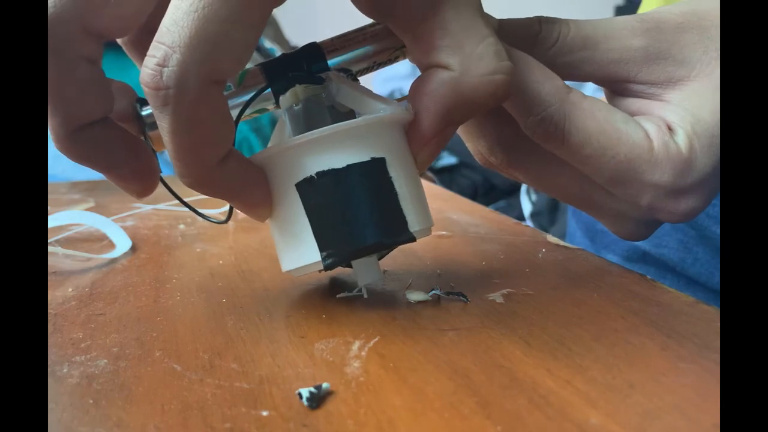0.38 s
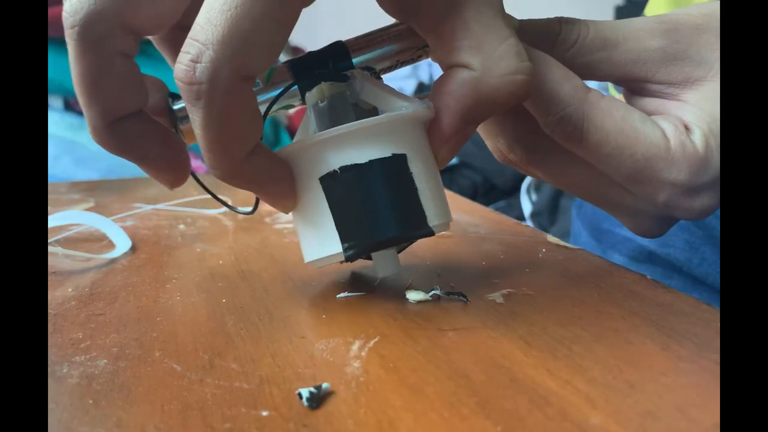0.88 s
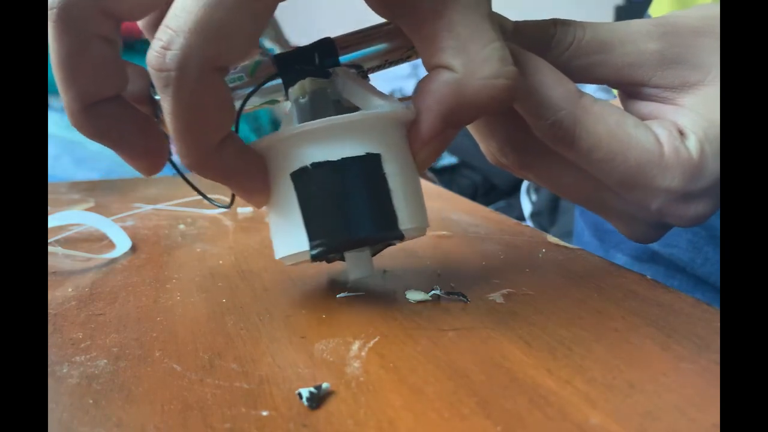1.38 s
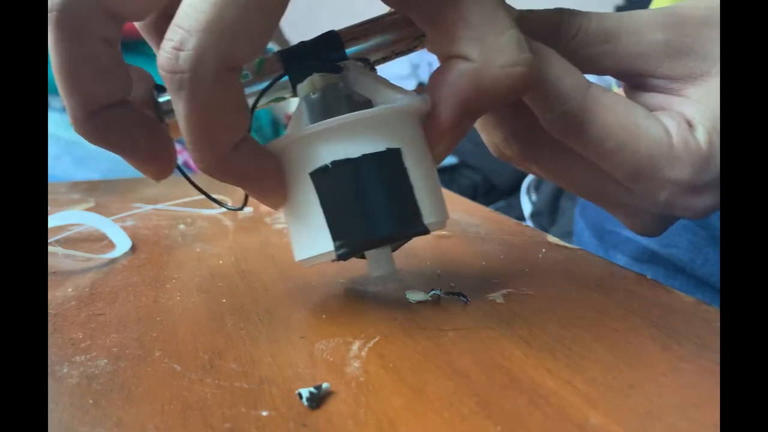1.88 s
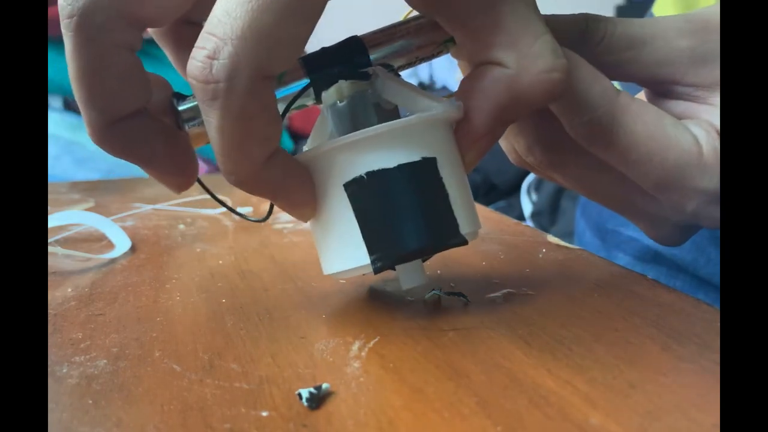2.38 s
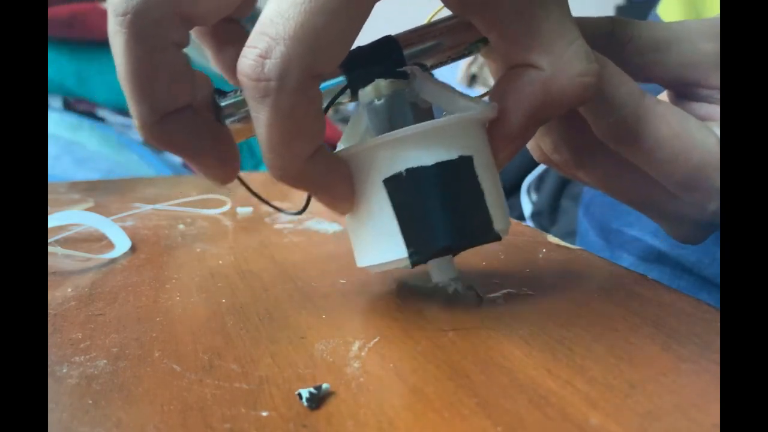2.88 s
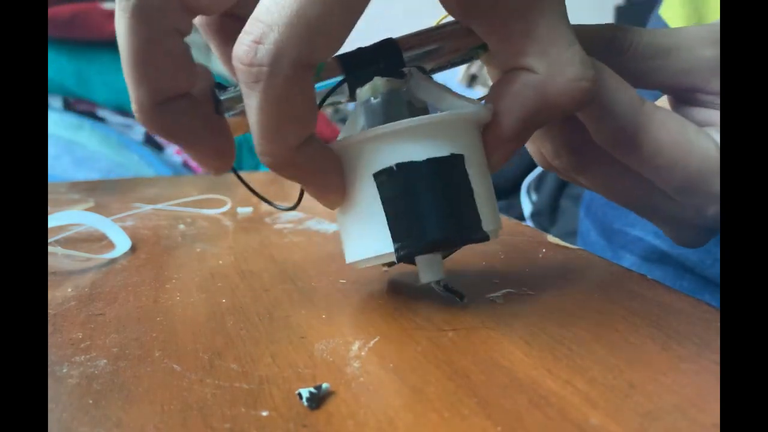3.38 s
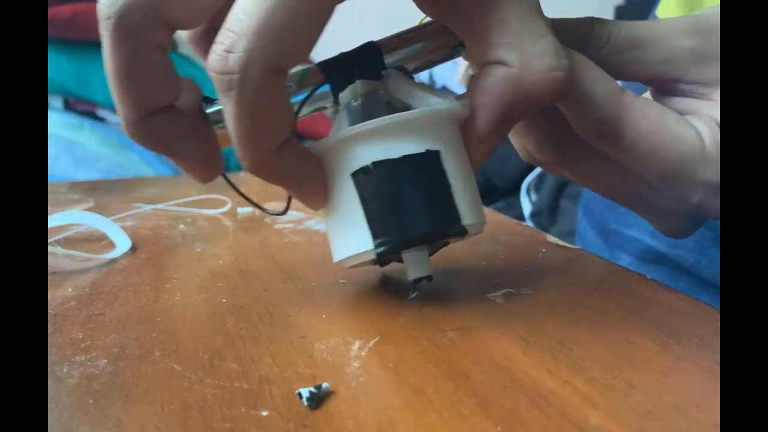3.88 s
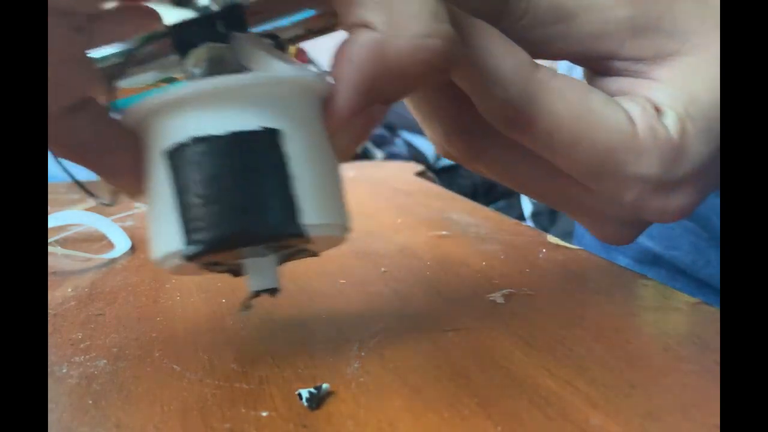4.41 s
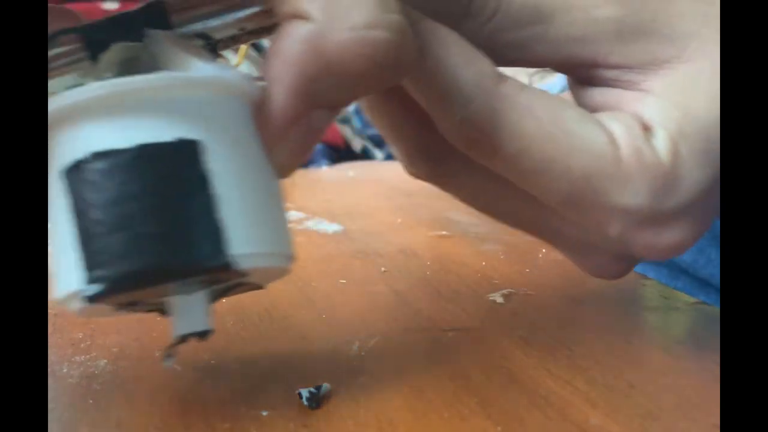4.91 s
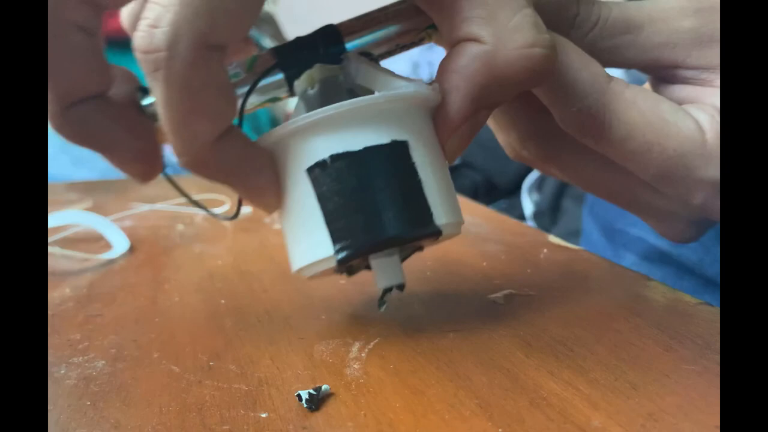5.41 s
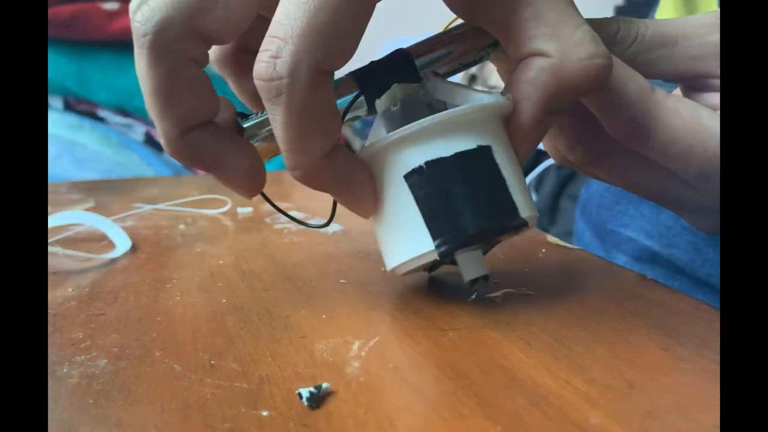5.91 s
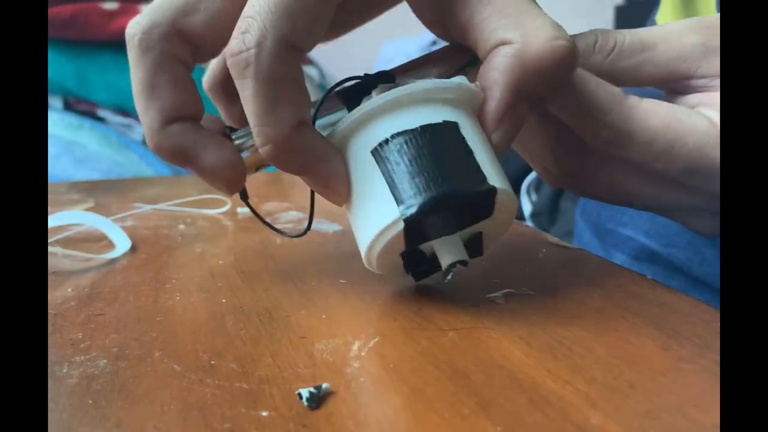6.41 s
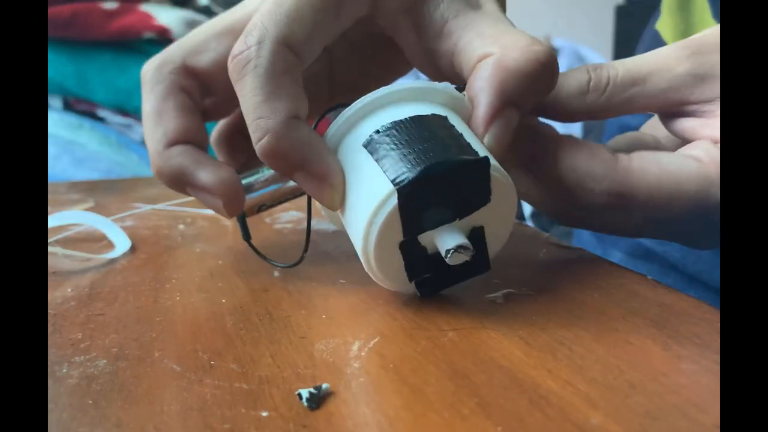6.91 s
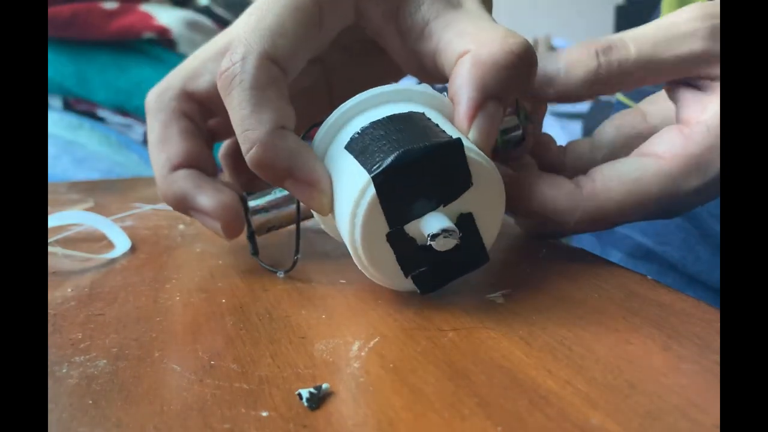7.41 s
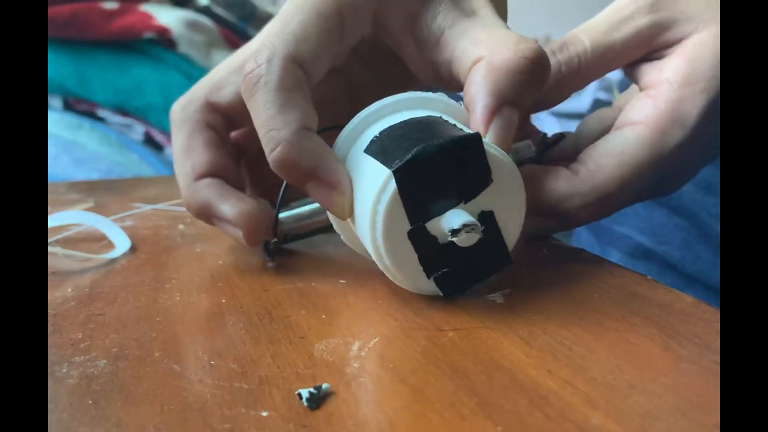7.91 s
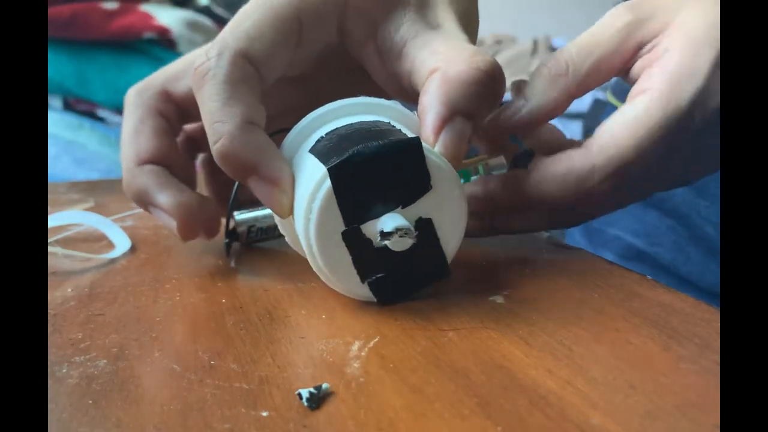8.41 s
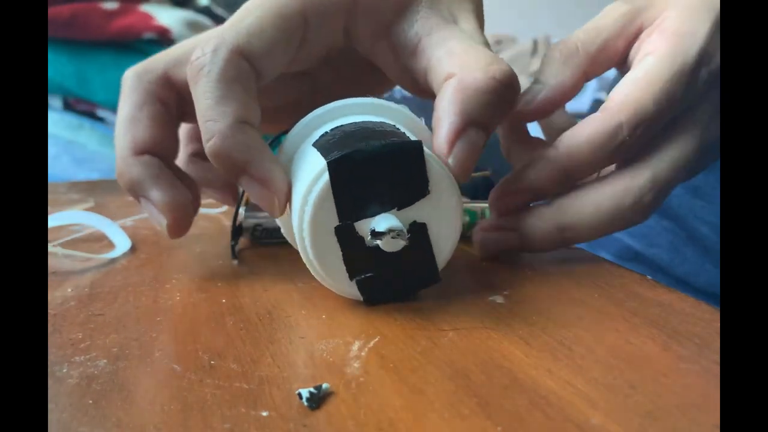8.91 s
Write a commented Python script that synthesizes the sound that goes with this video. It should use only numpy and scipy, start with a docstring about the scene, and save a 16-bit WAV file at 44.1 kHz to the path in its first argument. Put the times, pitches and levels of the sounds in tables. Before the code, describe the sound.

A tiny battery motor buzzes close to a stereo microphone, with nearly constant pitch, metallic ringing near two kilohertz and fizzy hiss. Tiny sharp clicks come singly and in clusters, with brief dips in loudness. Handling makes the buzz waver more strongly, then the motor coasts down, duller and quieter but still turning, with faint bumps and one loud wooden knock just before the end.

```python
"""Hand-held battery motor over a desk

A small motor in a plastic housing runs in two hands, then coasts down once its current is cut.
Shaft orders are sines that hum and whine; brush hiss, rattle and can ring are shaped noise.
Tape and wire ticks are crackly bursts; late on, knocks of the housing ring desk modes.
Two microphone ports hear the motor with differing gain, phase and noise."""
import sys
import numpy as np
from scipy import signal
from scipy.fft import rfft, irfft, next_fast_len
from scipy.io import wavfile
from scipy.ndimage import uniform_filter1d

SR = 44100
rng = np.random.default_rng(int(sys.argv[2]) if len(sys.argv) > 2 else 0)


def invert_db(level):
    """Linear amplitude ratio for a level in decibels (20 dB per decade), elementwise."""
    return 10 ** (np.asarray(level, dtype=float) / 20)


def dump(signal):
    """Clip the signal to [-1, 1] and save it as 16-bit WAV at the path in sys.argv[1]."""
    limited = np.clip(np.atleast_2d(signal).T, -1, 1)
    pcm = np.round(limited * 32767).astype(np.int16)
    wavfile.write(sys.argv[1], SR, pcm)


N = 398647
T = np.arange(N) / SR

# right port against left: (frequency [Hz], gain [dB], lead [rad], likeness of noise [0-1])
PORT_RESPONSE = [(40, -2, -1, 1), (205, -1.5, 0.87, 0.55), (380, -2.5, -0.8, 0.2), (636, -8, -1.15, 0.98),
                 (846, -14, -1.5, 0), (1032, -11.5, 1, 0.7), (1160, -1.5, -1, 1), (1450, -8.5, 0.74, 0.47),
                 (1597, -5.5, 1.3, 1), (1796, -2, -1.5, 0), (1990, 1.5, -3, 0.47), (2185, 0.5, -4, 1),
                 (2570, -12.5, -6.5, 0.9), (3035, 1.5, -8, 0), (4110, 1.5, -11, 0), (5360, 5, -8.5, 0),
                 (5840, 1.5, -8, 0.8), (6940, -1, -4.5, 0.77), (8140, 0.5, -4, 0.99),
                 (9070, 0.5, -2, 0.998), (9300, 0.5, -2, 1), (10400, -2, -1.5, 1), (12450, 1, 2, 0.9),
                 (13440, -1.5, 4, .998), (13770, 0.5, 3.5, 0.8), (14800, 0.5, 5, 0.97), (15600, 0, 7, 0.7)]
# room air colour: (frequency [Hz], density re room level [dB per Hz])
ROOM_COLOUR = [(20, -27), (45, -17), (100, -19.5), (260, -18), (430, -28), (900, -21.5), (1500, -25),
               (2000, -43), (5000, -41.5)]
# room air level: (time [s], level [dB])
ROOM_LEVEL_DB = [(0, -64), (2.7, -65.5), (4.1, -68), (4.45, -65.5), (4.8, -66.5), (8.2, -68.5), (9.04, -69)]
# brief level dips of motor and room: (start [s], time to deepest point [s], depth [dB])
LEVEL_DIPS = [(1.25, 0.072, -3.5), (2.32, 0.11, -1.5), (4.57, 0.041, -8.5), (4.63, 0.061, -11),
              (5.009, 0.045, -7), (5.81, 0.077, -4), (6.46, 0.087, -2), (7.38, 0.054, -10),
              (7.95, 0.21, -2), (8.6, 0.38, -3)]
# housing against desk: (time [s], level [dB], hardness [dB per octave])
DESK_KNOCKS = [(6.452, -27, 9), (7.643, -27.5, -8.5), (7.95, -43, -12), (8.492, -39.5, 6), (8.581, -35, -5),
               (8.846, -10, -5), (8.867, -20.5, -5), (8.883, -22.5, -3), (8.939, -36.5, -10)]
# desk modes: (nominal frequency [Hz], level before hardness [dB], t60 [s])
DESK_MODES = [(79.4, -25, 0.19), (225, -30, 0.091), (265.5, 7, 0.11), (302, 6, 0.078), (396, 0.5, 0.1),
              (470, 5, 0.1), (592, 1, 0.15), (697, -4, 0.25), (1010, 4, 0.051), (1285, 3, 0.022),
              (1540, 5, 0.087), (2120, -11, 0.039), (3300, -61, 0.018)]
# tape and wire ticks: (time [s], level [dB], colour centre [Hz], length to -60 dB [s])
TAPE_TICKS = [(0.4364, -32, 9420, 0.01), (0.442, -15.5, 11600, 0.0068), (0.453, -18.5, 11300, 0.011),
              (0.457, -19, 11500, 0.01), (0.61, -23, 11200, 0.01), (1.239, -10.5, 11200, 0.016),
              (1.2575, -14.5, 10800, 0.005), (2.2952, -18, 11800, 0.013), (2.298, -17, 12000, 0.0036),
              (2.3012, -18.5, 10400, 0.011), (2.586, -20.5, 11480, 0.0076), (2.6652, -18, 11500, 0.007),
              (2.968, -17, 10100, 0.0096), (2.979, -17.5, 11200, 0.0045), (3.102, -23.5, 11720, 0.012),
              (3.4803, -18.5, 11000, 0.009), (3.484, -19, 11290, 0.0052), (3.4865, -21, 11500, 0.005),
              (3.489, -15.5, 10500, 0.004), (3.561, -24, 11600, 0.0098), (3.597, -22.5, 11700, 0.011),
              (3.646, -15, 11550, 0.017), (4.053, -22, 9500, 0.0099), (4.278, -23.5, 11240, 0.0094),
              (4.528, -17.5, 11900, 0.0086), (4.533, -15.5, 11580, 0.011), (4.541, -16, 11100, 0.0092),
              (4.561, -16.5, 6440, 0.02), (4.621, -15, 11600, 0.019), (4.634, -21, 11800, 0.01),
              (4.944, -25, 11670, 0.0077), (4.987, -14, 11500, 0.0046), (4.99, -11.5, 11520, 0.0091),
              (4.996, -23, 6500, 0.017), (5.051, -26, 11800, 0.017), (5.309, -23, 11420, 0.0086),
              (5.375, -15.5, 12000, 0.0077), (5.448, -21.5, 6440, 0.0092), (5.643, -24, 6450, 0.024),
              (5.802, -13.5, 6350, 0.021), (6.431, -16, 11500, 0.014), (6.45, -13.5, 11800, 0.014),
              (6.631, -20, 11200, 0.0053), (6.759, -20.5, 11530, 0.015), (7.37, -13, 12200, 0.023),
              (7.629, -16, 11200, 0.0098), (7.744, -27, 11720, 0.0096), (7.7675, -22.5, 11600, 0.011),
              (7.786, -16, 11600, 0.0082), (7.926, -25.5, 11340, 0.0075), (7.947, -20.5, 11000, 0.0092),
              (8.131, -29, 11100, 0.0078), (8.481, -22, 11270, 0.0073), (8.4897, -18.5, 5950, 0.011),
              (8.515, -23.5, 6030, 0.012), (8.5305, -15, 6140, 0.013), (8.569, -19, 10900, 0.009),
              (8.573, -17, 11300, 0.016), (8.5833, -27, 10500, 0.012), (8.586, -20.5, 14800, 0.012),
              (8.609, -32, 11300, 0.012), (8.698, -28.5, 11200, 0.016), (8.832, -22, 11500, 0.013),
              (8.843, -19, 6060, 0.014), (8.997, -28, 11500, 0.0097)]
# colour shared by the ticks: (frequency [Hz], gain [dB])
TICK_SPECTRUM = [(200, -66), (1000, -5), (2000, -13), (4000, -9), (6000, -3.5), (8500, 6), (12000, -2),
                 (14000, 7), (15600, -2.5)]

# noise colours at the left port: (frequency [Hz], density re the layer's level [dB per Hz])
RATTLE_COLOUR = [(400, -54), (550, -34.5), (900, -44), (1300, -31.5), (1550, -23.5), (1750, -30),
                 (1960, -37.5), (2300, -53), (3200, -50)]
HISS_COLOUR = [(2000, -76), (2600, -46.5), (3150, -52), (3500, -51.5), (4000, -56), (4500, -50),
               (5300, -52), (6200, -44.5), (7500, -36), (8700, -44), (9400, -34.5), (10100, -36),
               (11800, -34.5), (14300, -38), (15000, -42.5), (15600, -33.5)]
CAN_COLOUR = [(1800, -55), (1960, -39), (2100, -18), (2200, -14.5), (2300, -22.5), (2400, -25.5),
              (2600, -42.5), (3200, -47.5)]  # motor can, rings near 2.2 kHz
SCRAPE_COLOUR = [(5200, -63), (5800, -34.5), (6050, -29.5), (6350, -36), (7000, -58)]

# shaft speed before the coast-down decay: (time [s], speed [turns per s])
SHAFT_SPEED = [(0.05, 208.4), (0.35, 208.1), (0.65, 207.4), (0.87, 208.5), (1.07, 207.0), (1.45, 206.4),
               (2.1, 206.3), (2.27, 206.7), (2.45, 204.9), (2.65, 204.5), (2.85, 205.0), (3.05, 203.8),
               (3.37, 205.0), (3.62, 203.6), (3.95, 204.7), (4.25, 203.7), (4.55, 203.2), (4.65, 201.9),
               (5.15, 205.1), (5.85, 204.8), (6.25, 204.5), (6.45, 206.0), (6.6, 205.5), (6.75, 207.5),
               (6.9, 206.3), (7.05, 207.4), (7.35, 203.9), (7.6, 204.3)]
# hands: (time [s], housing turned away [0-1], finger pressure [0-1], swing of order 1 [dB], grip height [0-1])
HANDS = [(0.0, 0.01, 0.08, 1.5, 0), (1.002, 0.2, 0, 0.5, 0.1), (1.398, 0.38, 0.04, -0.5, 0),
         (2.3, 0.5, 0.01, 2.5, 0.1), (2.6, 0.45, 0, 0.5, 0.3), (2.751, 0.83, 0.13, 1, 0.24),
         (3.9, 0.98, 0.04, 0.5, 0), (4.5, 0.87, 0.45, 5, 0.13), (4.75, 1, 0.63, 5.5, 0.1),
         (5.3, 0.77, 0.4, 5.5, 0.16), (5.851, 1, 0.05, 0, 0.46), (6.0, 0.33, 0.12, 5.5, 0.7),
         (6.22, 0.45, 0, 1, 1.0), (6.25, 0.8, 0.3, 3, 0), (6.381, 0.9, 0.33, 0.5, 0.5),
         (6.6, 0.9, 0.37, 2, 0.5), (6.63, 0.36, 0.63, 1, 0.7), (6.8, 0.9, 0.53, 1.5, 0.9),
         (7.0, 0.97, 0.34, 2.5, 0.4), (7.12, 0.98, 0.48, 9, 0), (7.32, 0.7, 0.7, 9.5, 0.24),
         (7.42, 0.4, 0.87, 2, 0.4), (7.591, 0.2, 0.93, -7, 0)]
# fingers let go, housing stops singing: (start [s], length [s], drop [dB], swell just before [dB])
GRIP_SLIPS = [(5.889, 0.078, -7.5, 3), (6.25, 0.082, -9.5, -5), (6.885, 0.2, -12, -0.5),
              (7.096, 0.094, -10.5, 9.5), (7.326, 0.051, -2.5, 6.5)]
# low orders: (multiple of shaft speed, level [dB], change when turned away [dB],
#              change under pressure [dB], change when gripped high [dB], phase [rad])
HUM_ORDERS = [(1, -56.5, -1, -3.5, -2.5, -0.84), (2, -76, -0.5, 23.5, 2.5, 0.66),
              (3, -60.5, -2.5, 15, -5, 2), (4, -61, -1.5, 4, 3.5, 0.35), (5, -53.5, 3.5, 4.5, -6.5, 1.24),
              (6, -49.5, -6.5, 6, -2, 1.04), (7, -46, -4.5, 0.5, 2.5, 2), (8, -53.5, -5.5, -14, -3, 2.1)]
# high orders: (multiple of shaft speed, level re rattle below 13, re hiss from 13 up [dB],
#               change when turned away [dB], change under pressure [dB])
WHINE_ORDERS = [(9, -13, 3, -4), (10, -10, -2, -8), (11, 4, -5.5, -1), (12, -20, 7, 0),
                (13, -27.5, 10.5, 3), (14, -29, 7.5, 2), (15, -24.5, -0.5, 6), (16, -18.5, -3.5, 8),
                (17, -31, -8, -2), (18, -17.5, -3.5, 5), (19, -16.5, -4.5, -1), (20, -19.5, -3, -6),
                (21, -15.5, -3.5, -1.5), (22, -31, 1, -1), (23, -27, -8, 4), (24, -19, -5, 7),
                (25, -20, -3, 6), (26, -26, 5.5, -12), (27, -12.5, -6, 4), (28, -14, -4, 1),
                (29, -22, 3, -5), (30, -11, -5.5, 2), (31, -19.5, -6.5, 5.5), (32, -21, 1, 8),
                (33, -13.5, -4.5, -4), (34, -23, -6, 2), (35, -27, 0, -2), (36, -32, 3, -5),
                (37, -25, -4, 2), (38, -23, 2, 0), (39, -17, -5, 5), (40, -29, -1, 4), (45, -13.5, 3, -16),
                (46, -18, -3, -3), (47, -22, -2, -7), (48, -8, 3, -13), (49, -18, -5, 0), (50, -19, -1, -7),
                (51, -4.5, -1.5, -8), (52, -18, 1, 3), (53, -17, 2, 7), (54, -6.5, -6, -6),
                (55, -17.5, 0, 8), (56, -15, 2, 7), (57, -16, 4, -1), (58, -15.5, 8, -1),
                (59, -8.5, -5, -8), (60, -22, 11, -2), (61, -19, 3, -5), (62, -14, 8, -13)]
# housing resonances swept by the falling orders: (frequency [Hz], width [Hz], gain [dB])
HOUSING_MODES = [(114, 52, 3), (172, 24, -6.5), (240, 27, 9.5), (373.4, 210, -10), (564, 38, 0),
                 (704, 72, 6.5), (875, 50, 1.5), (989, 63, 3.5), (1132, 68, 2), (1314, 160, 2.5),
                 (1450, 150, -0.5)]
# coasting low orders as the hands shift: (time [s], level before resonances [dB])
COAST_LEVEL_DB = [(7.6, -49.5), (7.8, -55), (7.86, -59), (7.98, -63), (8.0, -70), (8.3, -69.5), (8.36, -63),
                  (8.55, -67.5), (8.6, -66.5), (8.8, -64.5), (9.04, -62)]

CUT_S, SLOWING_PER_S, SETTLE_S = 7.595, 0.476, 0.48
SWELL_S, SLIP_S, REGRIP_S = 0.055, 0.0023, 0.038
RATTLE_DB, RATTLE_TURN_DB, RATTLE_PRESS_DB, RATTLE_IDLE_DB = -51, -3.5, 2, -22
HISS_DB, HISS_IDLE_DB = -47, -5
RATTLE_SLIP, HISS_SLIP = 0.46, 0.33  # share of the slip dB
CAN_TURN_DB, CAN_PRESS_DB = -3.5, -5.5  # on top of the rattle's own changes


def track(table, column=1):
    """A time table's column at every sample."""
    columns = np.transpose(table)
    return np.interp(T, columns[0], columns[column])


def read(points, hz, column=1):
    """A spectrum column on a log-frequency axis."""
    table = np.transpose(points)
    return np.interp(np.log(hz + 1), np.log(table[0] + 1), table[column])


def coloured(x, gain):
    """Multiplies the spectrum of x by gain(hz)."""
    size = next_fast_len(len(x))
    spectrum = rfft(x, size) * gain(np.fft.rfftfreq(size, 1 / SR))
    return irfft(spectrum, size)[:len(x)]


def drift(samples):
    """Slow random curve of rms 1, drawn every 32 samples and smoothed twice."""
    width = max(int(samples / 32), 2)
    x = rng.standard_normal(N // 32 + 2)
    x = uniform_filter1d(uniform_filter1d(x, width), width)
    return np.interp(np.arange(N) / 32, np.arange(len(x)), x / x.std())


def ports(x, other=None):
    """Left and right port; for noise a share of the right comes from an unrelated draw."""
    def turn(hz):
        return invert_db(read(PORT_RESPONSE, hz)) * np.exp(1j * read(PORT_RESPONSE, hz, column=2))

    def same(hz):
        return np.clip(read(PORT_RESPONSE, hz, column=3), 0, 1)

    if other is None:
        return np.array([x, coloured(x, turn)])
    shared = coloured(x, lambda hz: turn(hz) * same(hz))
    unrelated = coloured(other, lambda hz: abs(turn(hz)) * np.sqrt(1 - same(hz) ** 2))
    return np.array([x, shared + unrelated])


def noise(colour, envelope):
    """Port pair of noise with a density per Hz, under one envelope."""
    def density(hz):
        return invert_db(read(colour, hz)) * np.sqrt(SR / 2)

    a, b = (envelope * coloured(white, density) for white in rng.standard_normal((2, N)))
    return ports(a, b)


def room():
    """Low murmur of the room air: shaped noise at a slowly moving level."""
    return noise(ROOM_COLOUR, invert_db(track(ROOM_LEVEL_DB)))


def dips():
    """Gain of the brief dips: each falls fast and recovers about three times slower."""
    total_db = np.zeros(N)
    for start_s, deepest_s, depth_db in LEVEL_DIPS:
        u = np.maximum(T - start_s, 0) / deepest_s
        total_db += depth_db * u * np.exp(1 - u)
    return invert_db(total_db)


def knocks(rise_s=0.0011, scatter=0.0417, puff_db=-15, puff_t60_s=0.091):
    """Each blow rings the desk modes and leaves a dull puff of reflections."""
    out, t = np.zeros(N + 16384), np.arange(16384) / SR
    for start_s, db, hard_db in DESK_KNOCKS:
        ring = np.zeros(len(t))
        for hz, mode_db, t60_s in DESK_MODES:
            fade = invert_db(mode_db + hard_db * np.log2(hz / 300) - 60 * t / t60_s)
            mode_hz = hz * (1 + scatter * rng.standard_normal())
            ring += fade * np.sin(2 * np.pi * (mode_hz * t + 0.18 * rng.random()))

        def dull(f):
            tilt = invert_db(hard_db * np.log2(f / 300 + 0.75))
            return tilt * (f / (f + 200)) ** 2 / (1 + (f / 1500) ** 2)

        puff = coloured(rng.standard_normal(len(t)), dull)
        puff *= invert_db(puff_db - 60 * t / puff_t60_s) / puff.std()
        blow = (ring / abs(ring).max() + puff) * (1 - np.exp(-t / rise_s))
        out[round(start_s * SR):][:len(t)] += invert_db(db) * blow
    out = out[:N]
    direct = out * invert_db(np.array([[1.5], [-1.5]]))  # left louder
    return direct + invert_db(-12.5) * ports(out) * [[1], [-1]]  # faint port pair, right inverted


def ticks(rise_share=0.2, lumps_db=4.0, crackle=0.5, tail_db=-13, tail_t60_s=0.11,
          ring_db=11, ring_octaves=0.12):
    """Each tick is a crackly burst with its own lumpy colour, a peak at its centre and a faint tail."""
    out, t = np.zeros(N + 4096), np.arange(4096) / SR
    lump_hz = np.geomspace(700, 16000, num=20)
    for start_s, db, centre_hz, length_s in TAPE_TICKS:
        lumps = np.transpose([lump_hz, lumps_db * rng.standard_normal(20)])

        def colour(hz):
            octaves = np.log2((hz + 1) / centre_hz)
            peak_db = ring_db * np.exp(-(octaves / ring_octaves) ** 2)
            return invert_db(read(TICK_SPECTRUM, hz) + read(lumps, hz) + peak_db)

        swing = uniform_filter1d(rng.standard_normal(4096), 16) * 4
        grit = rng.standard_normal(4096) * np.exp(crackle * swing)
        burst = coloured(grit, colour)
        burst /= 2 * burst[:200].std()
        rise = np.minimum(t / (rise_share * length_s), 1) ** 2
        fade = invert_db(-60 * (t / length_s) ** 2)  # holds, then stops fast
        tail = invert_db(tail_db - 60 * t / tail_t60_s)
        out[round(start_s * SR):][:4096] += invert_db(db) * burst * rise * (fade + tail)
    return ports(out[:N])


def slips_db():
    """Each slip of the grip: a level change just before, a sudden drop, a hold and a quick regrip."""
    total_db = np.zeros(N)
    for start_s, length_s, drop_db, swell_db in GRIP_SLIPS:
        times_s = [-SWELL_S, 0, SLIP_S, length_s, length_s + REGRIP_S]
        total_db += np.interp(T - start_s, times_s, [0, swell_db, drop_db, drop_db, 0])
    return total_db


def hum(angle, speed, slip_db, waver_db=1.5, restless_db=2.0, restless_s=6.7):
    """Low orders: set by the hands while driven, by the housing resonances while coasting."""
    off = np.clip((T - CUT_S) / 0.04, 0, 1)
    coast = off * invert_db(track(COAST_LEVEL_DB))
    hz = np.arange(2000.0)
    power = sum(invert_db(2 * db) / (1 + (2 * (hz - f) / width) ** 2) ** 2 for f, width, db in HOUSING_MODES)
    housing = np.sqrt(power)
    turn, press, swing_db, high = (track(HANDS, column) for column in (1, 2, 3, 4))
    # the hands shift, and each order swells by itself
    restless = restless_db * np.clip(T - restless_s, 0, 0.5) * 2 * (1 - off)
    out = np.zeros(N)
    for k, db, turn_db, press_db, high_db, phase in HUM_ORDERS:
        grip_db = swing_db if k == 1 else slip_db * k / 5
        held = invert_db(db + turn_db * turn + press_db * press + high_db * high + grip_db)
        level = (1 - off) * held + coast * np.interp(k * speed, hz, housing)
        waver = invert_db(waver_db * drift(1000) + restless * drift(4000))
        out += level * waver * np.cos(k * angle + phase)
    return out


def whine(angle, driven, rattle, hiss, waver_db=2.5, flutter_db=1.3, kept_share=0.19):
    """High orders as sines that follow rattle or hiss and fall steeply with shaft speed."""
    turn, press = track(HANDS, 1), track(HANDS, 2)
    wavers = [invert_db(waver_db * drift(3600) + flutter_db * drift(330)) for _ in range(6)]
    kept = dips() ** -kept_share  # orders from 13 up sink less in a dip
    out = np.zeros(N)
    for k, db, turn_db, press_db in WHINE_ORDERS:
        lead = (rattle if k < 13 else hiss * kept) * driven
        level = invert_db(db + turn_db * turn + press_db * press) * lead * wavers[k % 6]
        out += level * np.cos(k * angle + 2 * np.pi * rng.random())
    return out


def brush_hiss(angle, hiss, beat=0.25, flicker_db=0.96):
    """Brush noise, pulsing once and twice a turn."""
    pulse = 1 + beat * (np.cos(angle) + np.cos(2 * angle + 1))
    return noise(HISS_COLOUR, hiss * pulse * invert_db(flicker_db * drift(330)))


def rattle_and_can(angle, rattle, beat=0.03, flicker_db=0.96):
    """Rattle pulses every turn; the can rings with it, damped more by turning and pressing."""
    shake = rattle * (1 + beat * np.cos(angle)) * invert_db(flicker_db * drift(600))
    can = shake * invert_db(CAN_TURN_DB * track(HANDS, 1) + CAN_PRESS_DB * track(HANDS, 2))
    return noise(RATTLE_COLOUR, shake) + noise(CAN_COLOUR, can)


def scrape(angle, driven, hiss, level_db=-2, sharpness=0.17):
    """Noise swelling gently once a turn, bared by the slowing."""
    once = np.exp(sharpness * (np.cos(angle) - 1))
    return noise(SCRAPE_COLOUR, invert_db(level_db) * hiss * (1 - driven) * once)


def motor(whine_fall=9.9):
    """Shaft angle drives all layers; after the cut friction slows it and hiss and rattle settle to idle."""
    after_s = np.maximum(T - CUT_S, 0)
    speed = track(SHAFT_SPEED) * np.exp(-SLOWING_PER_S * after_s)
    angle = 2 * np.pi * (np.cumsum(speed) / SR + 0.002 * drift(900))  # rad, with jitter
    idle, slip_db = np.minimum(after_s / SETTLE_S, 1), slips_db()
    hands_db = RATTLE_TURN_DB * track(HANDS, 1) + RATTLE_PRESS_DB * track(HANDS, 2)
    rattle = invert_db(RATTLE_DB + hands_db + RATTLE_SLIP * slip_db + RATTLE_IDLE_DB * idle)
    hiss = invert_db(HISS_DB + HISS_SLIP * slip_db + HISS_IDLE_DB * idle)
    driven = (speed / speed.max()) ** whine_fall
    tones = hum(angle, speed, slip_db) + whine(angle, driven, rattle, hiss)
    noises = brush_hiss(angle, hiss) + rattle_and_can(angle, rattle) + scrape(angle, driven, hiss)
    return ports(np.sqrt(2) * tones) + noises  # sqrt 2: levels are rms


def scene():
    """Dipping room and motor, with knocks and ticks on top."""
    return dips() * (room() + motor()) + knocks() + ticks()


def roll_off(x):
    """The treble ends steeply here."""
    return signal.sosfilt(signal.butter(12, 16810, fs=SR, output="sos"), x)


def record(dry):
    """Steep low-pass at the upper band edge."""
    edge = signal.firwin(1535, 15720, window=("kaiser", 9), fs=SR)
    mix = signal.oaconvolve(dry, edge[None], "same")
    return roll_off(mix)


dry = scene()
out = record(dry)
dump(out)
```